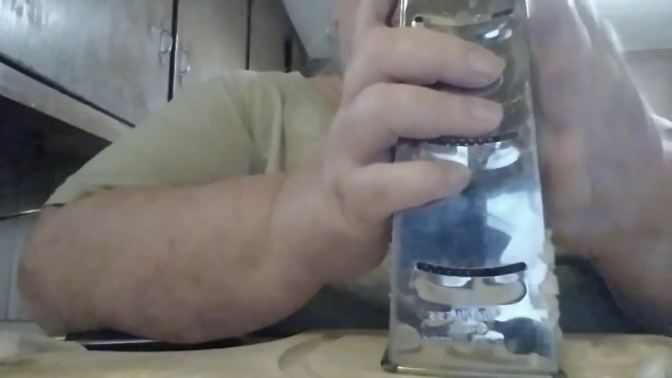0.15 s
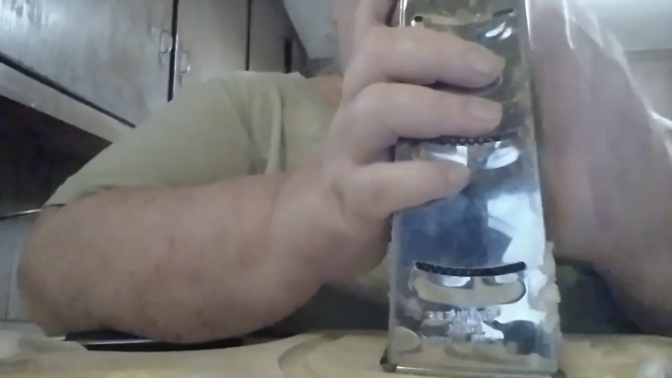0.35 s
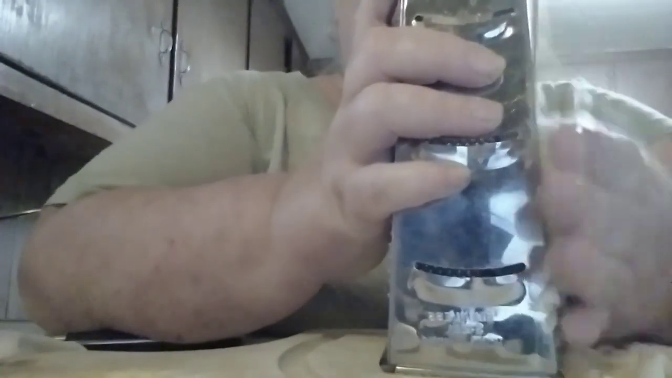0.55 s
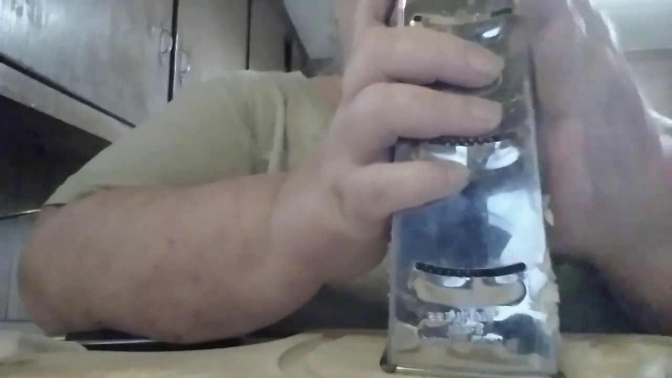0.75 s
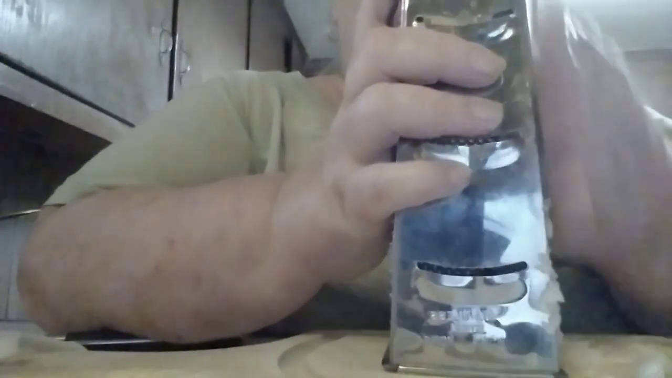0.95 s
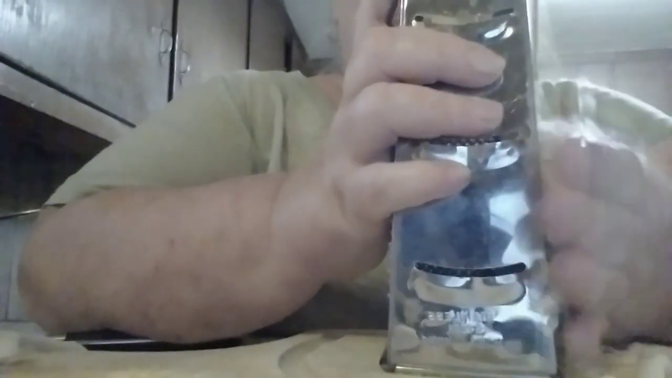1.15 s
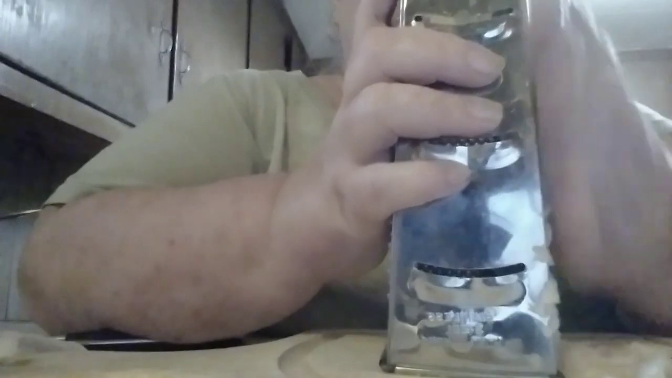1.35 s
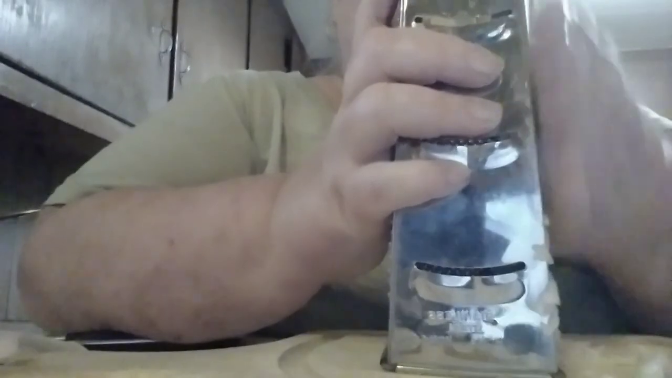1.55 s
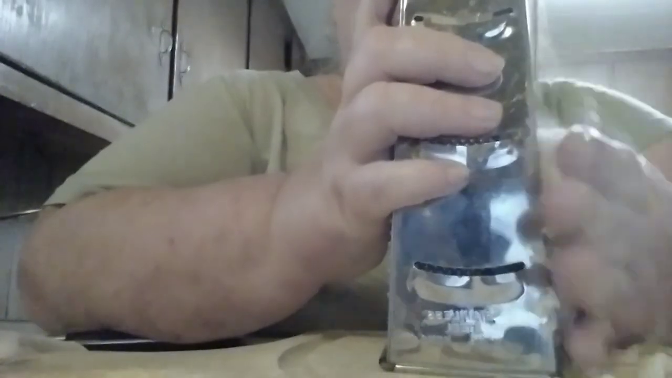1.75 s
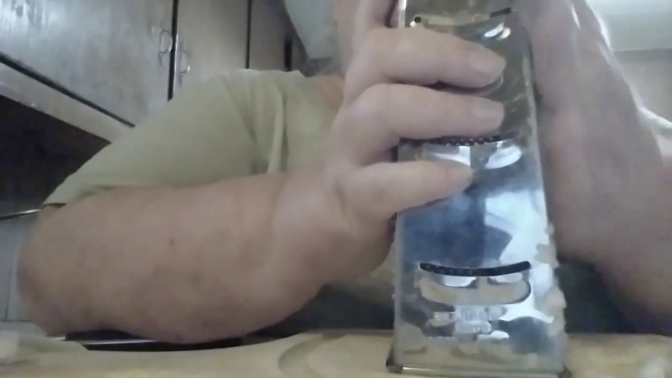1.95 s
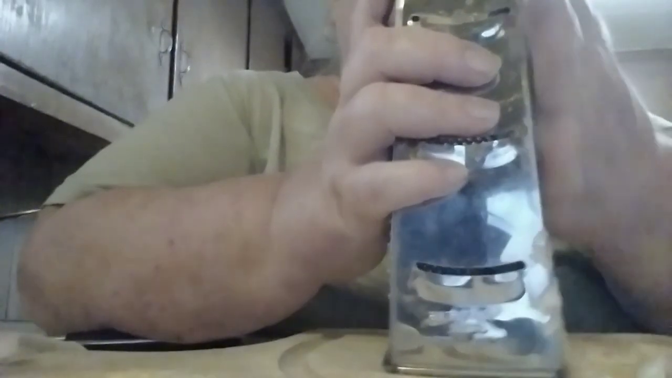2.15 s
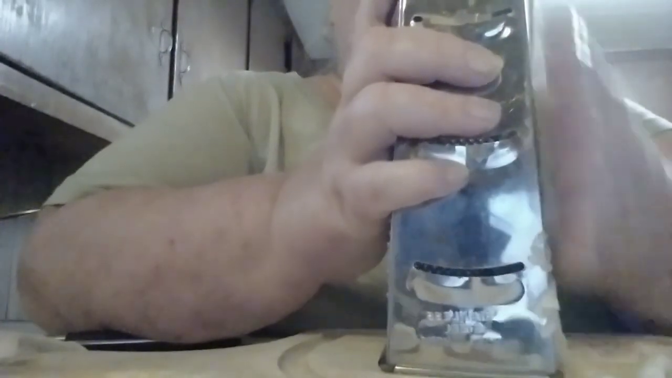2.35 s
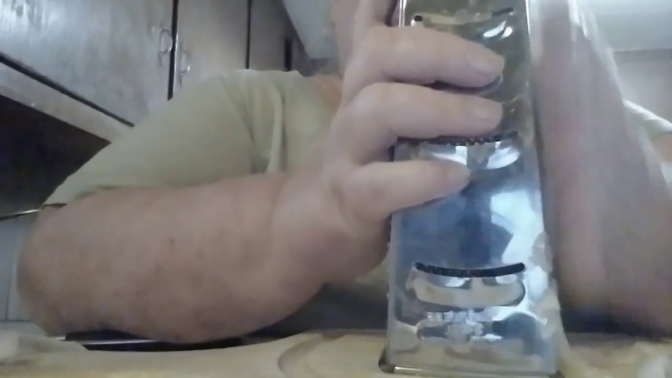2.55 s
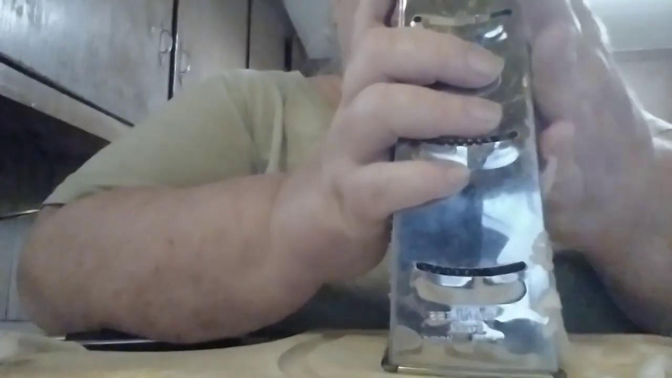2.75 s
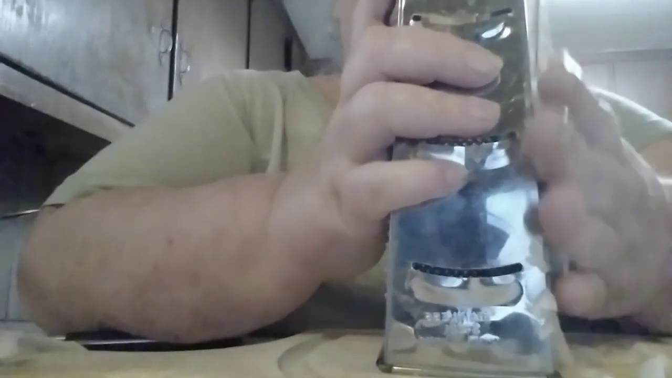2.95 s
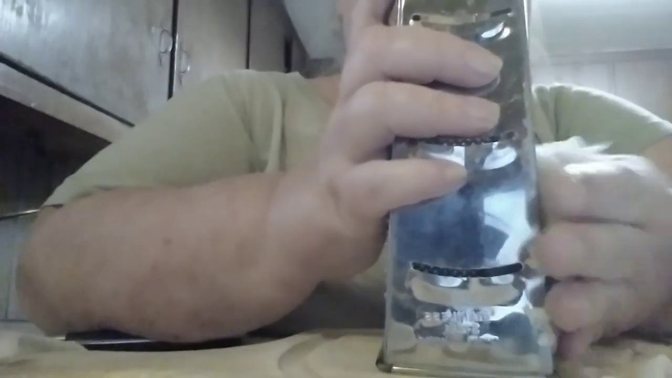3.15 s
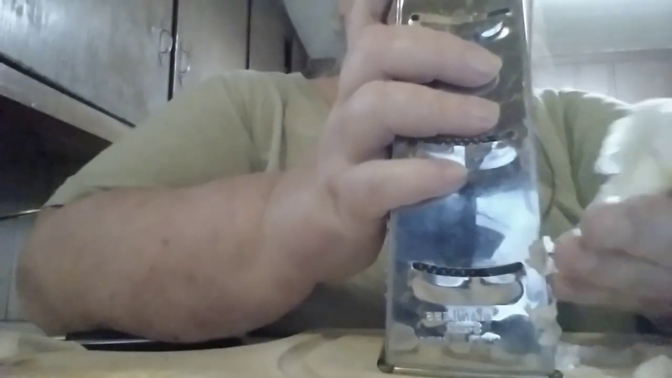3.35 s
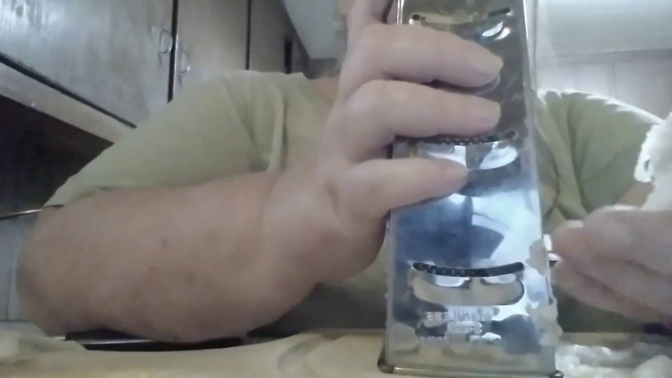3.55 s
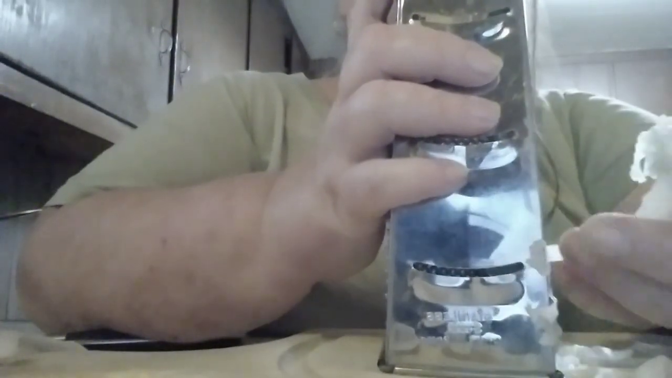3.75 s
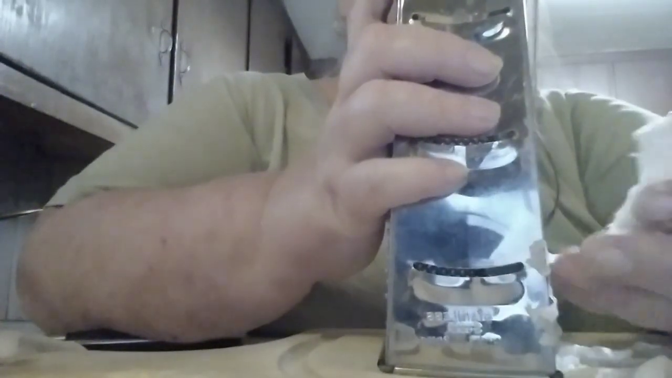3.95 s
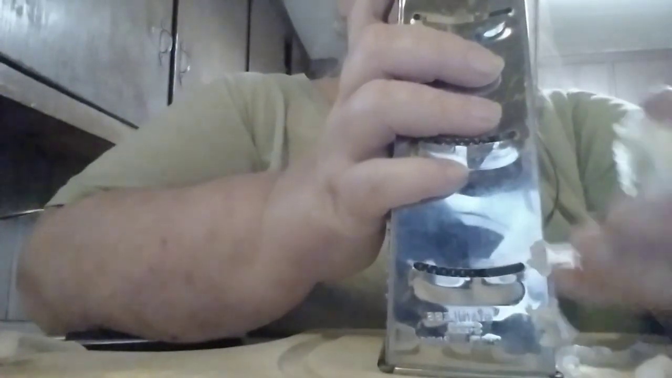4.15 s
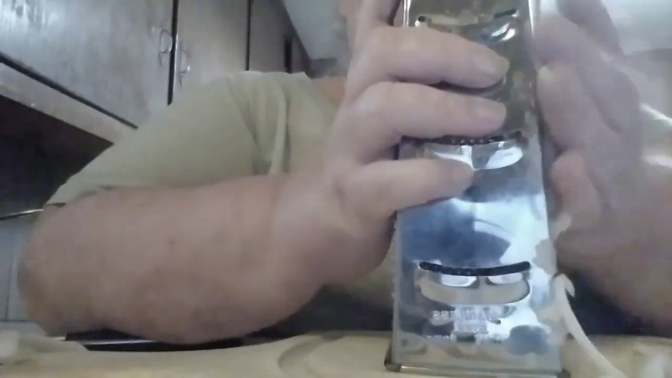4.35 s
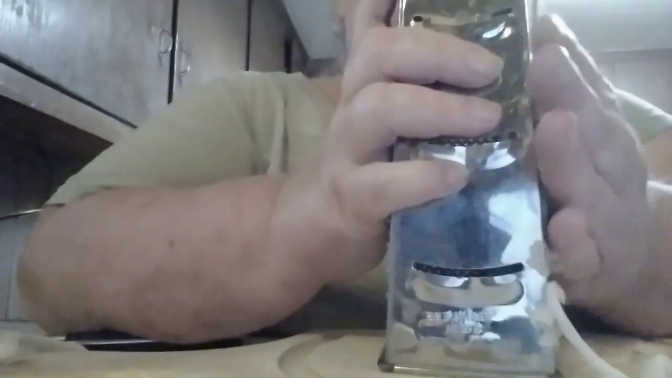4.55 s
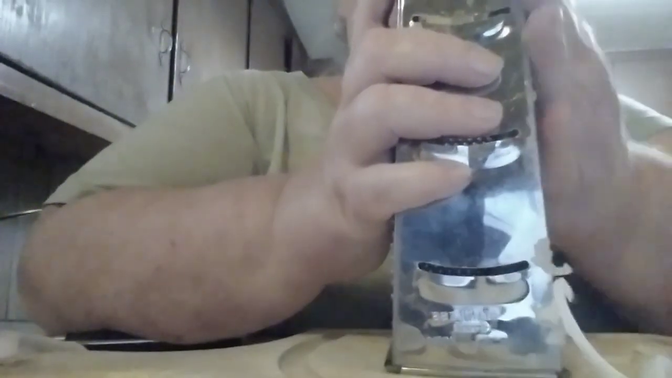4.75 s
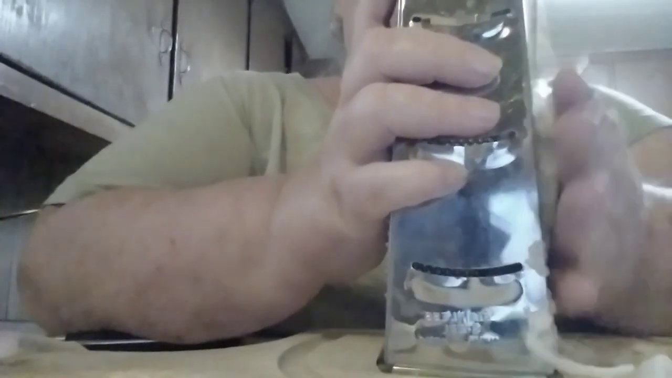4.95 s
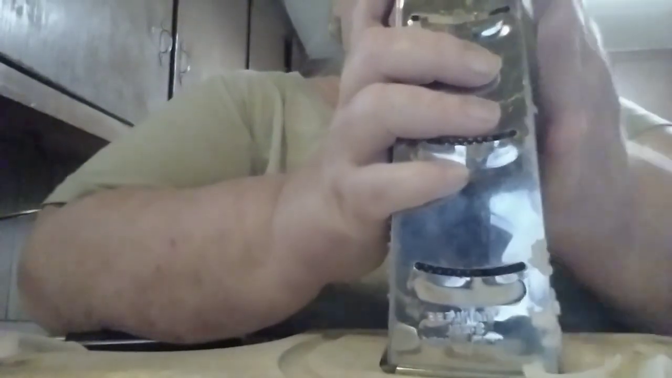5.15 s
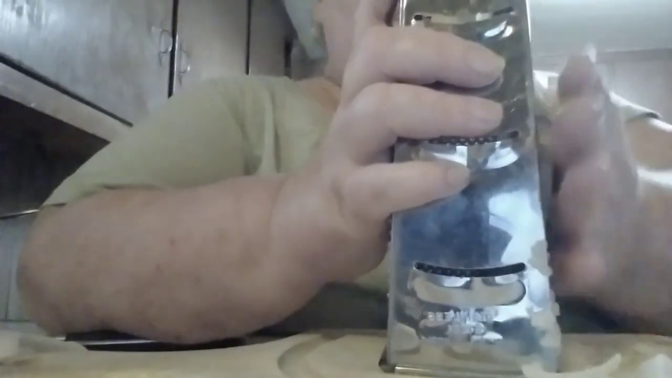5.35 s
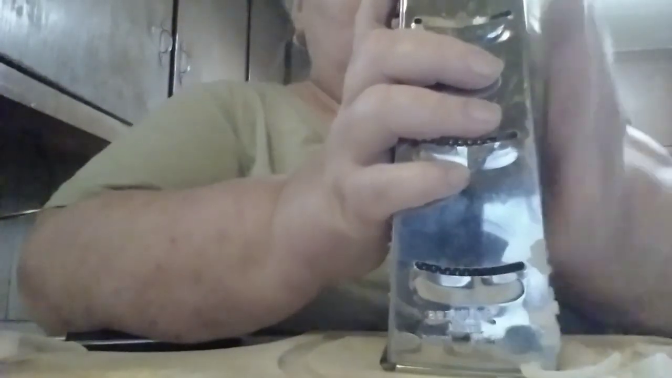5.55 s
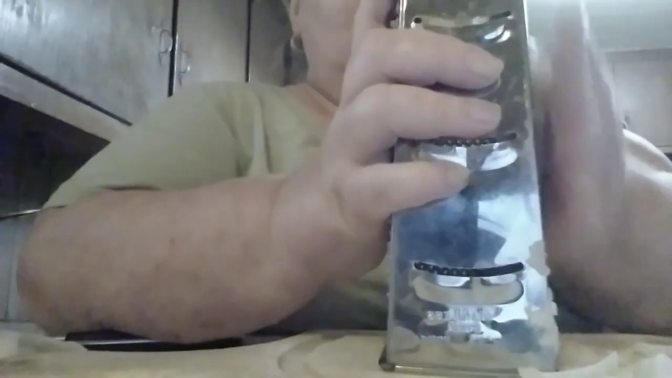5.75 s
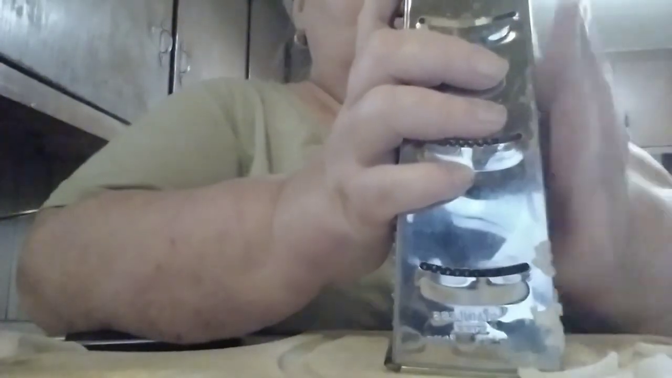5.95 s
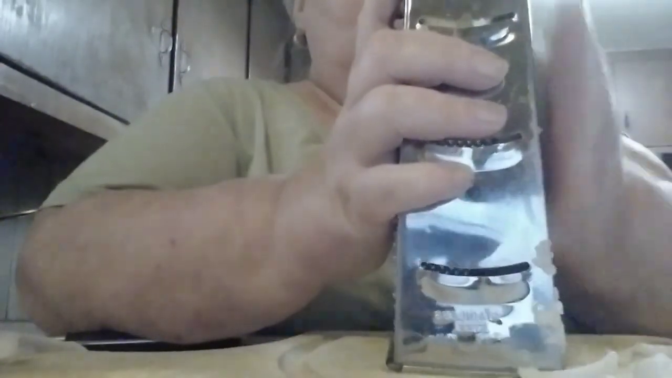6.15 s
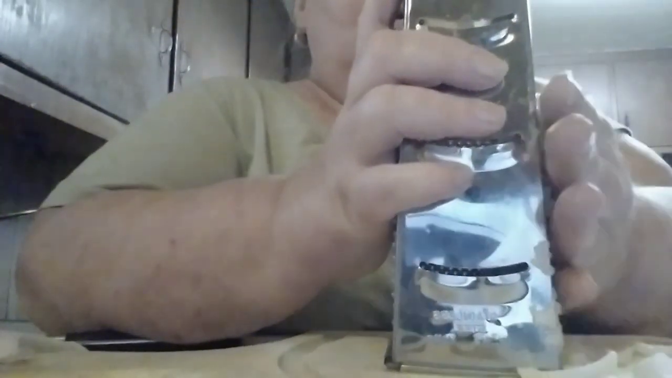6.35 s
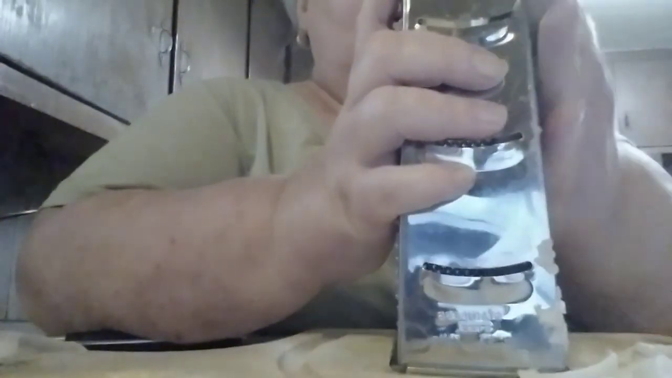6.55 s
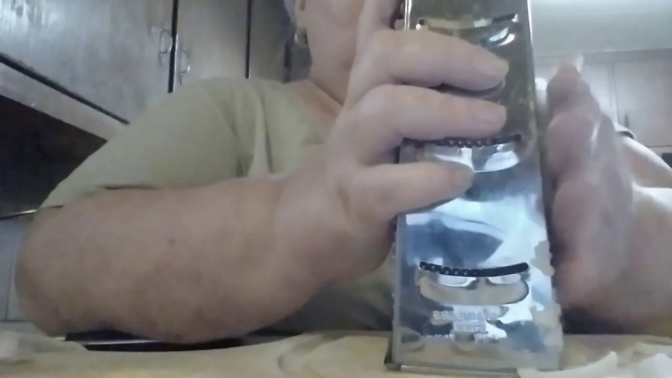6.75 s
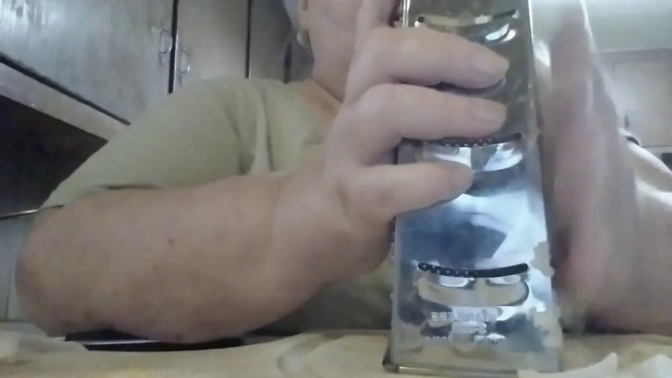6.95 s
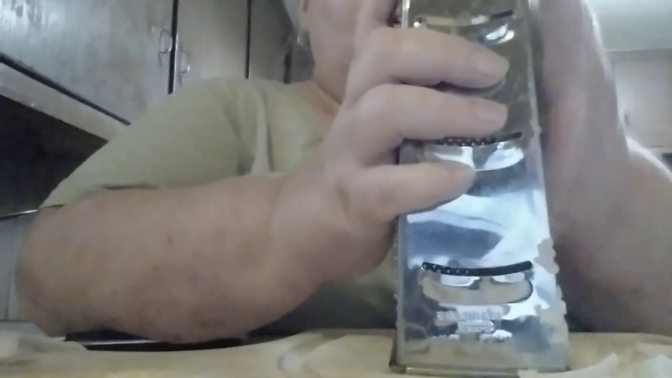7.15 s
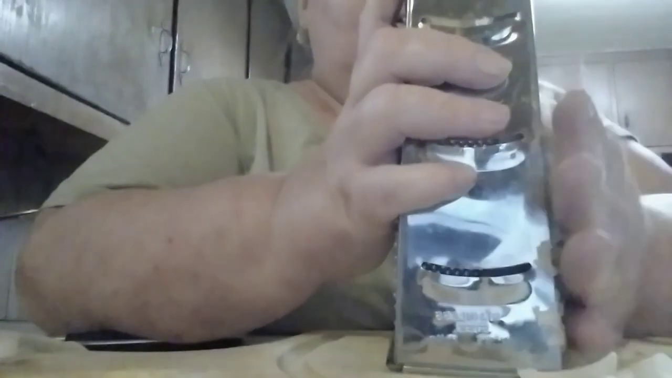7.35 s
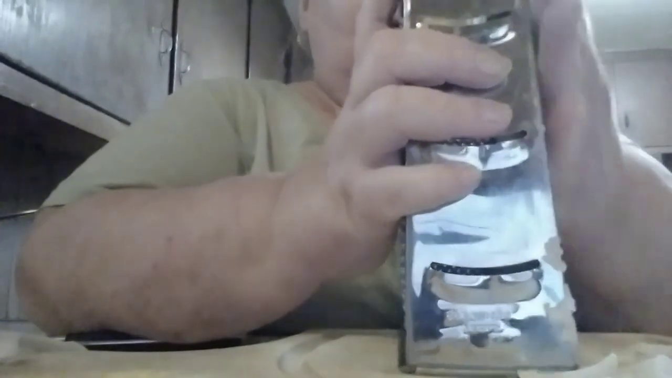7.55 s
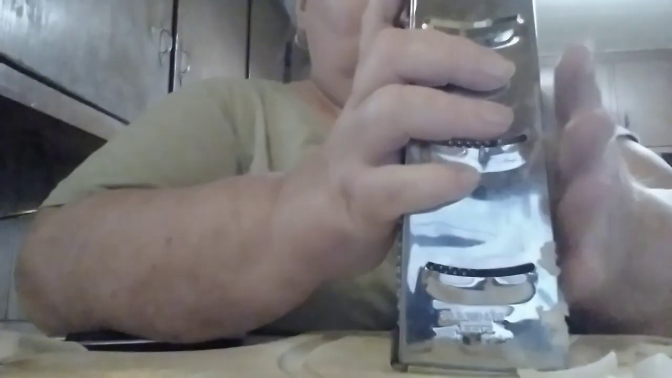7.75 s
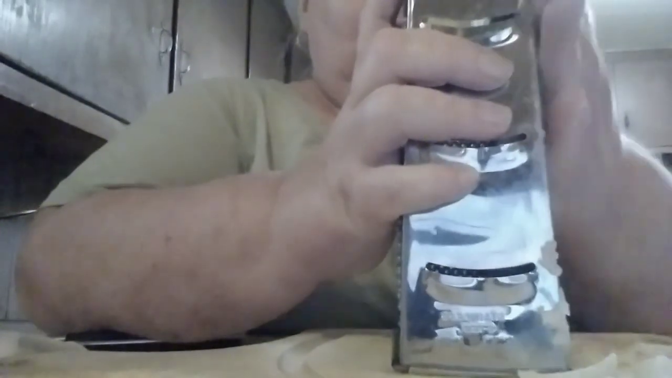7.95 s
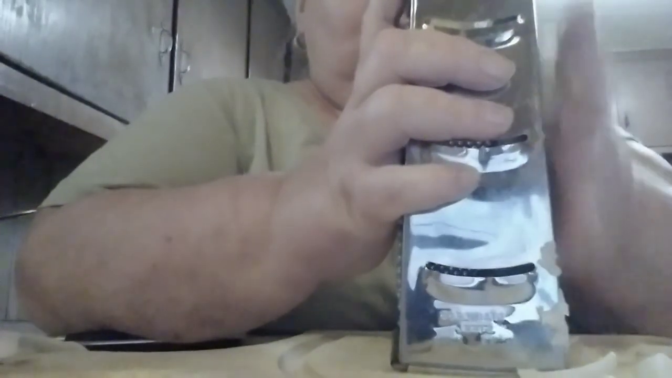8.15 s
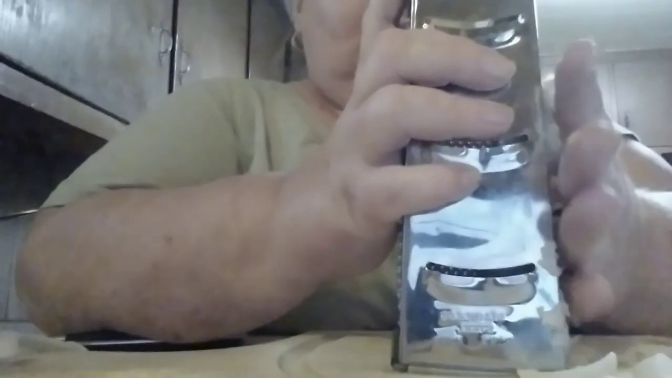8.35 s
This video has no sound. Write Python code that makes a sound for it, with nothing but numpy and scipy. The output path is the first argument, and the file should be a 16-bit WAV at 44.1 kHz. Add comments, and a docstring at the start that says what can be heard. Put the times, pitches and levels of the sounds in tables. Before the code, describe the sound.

An onion is rubbed against a steel box grater in quick rhythmic rasping strokes, pausing briefly before heavier strokes resume, close up in a kitchen.

```python
"""An onion is rubbed up and down a steel box grater that stands on a wooden board in a small kitchen.
Each push is many tiny bursts of tearing flesh, heard through the steel, and it shakes the box and board.
Each return is lighter and mostly a wet hiss. Every stroke builds to its hardest press and lets go.
Sharp clicks mark a snapping fibre or the first bite of a push; the foot's knocks clack and thump.
Partway the hand stops and turns the onion, amid soft rubs and rustles; a low rumble and hum lie behind."""
import sys
import numpy as np
from scipy import signal
from scipy.fft import rfft, irfft, next_fast_len
from scipy.io import wavfile
from scipy.ndimage import uniform_filter1d, map_coordinates

SR = 44100
rng = np.random.default_rng(int(sys.argv[2]) if len(sys.argv) > 2 else 0)


def master(y):
    """Save y as 16-bit WAV."""
    cut = np.clip(np.atleast_2d(y).T, -1, 1)
    pcm = np.round(cut * 32767)  # scale
    wavfile.write(sys.argv[1], SR, pcm.astype(np.int16))


N = 370881  # length in samples

# colour of the light wet slide: [f/Hz, level/dB]
SLIDE_COLOUR = [(150, -47), (300, -22), (380, -8.5), (900, -23), (1700, -26), (2600, -20), (4800, -10),
                (5150, 1), (8300, 1), (9500, -5), (11500, -8.5), (13500, -13), (15700, -12)]
# colour of the cutting rasp: [f/Hz, level/dB]
CUT_COLOUR = [(120, -21), (320, -23.5), (400, -8), (800, -11), (1200, 1.5), (1550, -12), (2200, -1.5),
              (3000, 1), (4800, 4), (5400, -3), (7000, -1), (10000, -6.5), (15700, -14.5)]


def grating(chatter_db=-0.5, catch_hz=130, slide_db=-0.4, cut_db=-0.3, wall_db=-0.4, shake_db=0.4):
    """Sliding hisses, cutting rasps, and the catching teeth shake box and board."""
    sliding, cutting, rubbing, shaking = efforts()
    shake = filtered(catches(rate=catch_hz, unevenness=0.35), board)
    shake = even(shake, 0.03)

    # once per swing the shaking box digs its teeth deeper, so the rasp comes in bursts
    bite = amp(chatter_db * np.clip(shake, -2, 2))
    tearing = ruptures(rate=8000, spread_db=4.5, clump_db=1.9, clump_rate=170)
    cut = through_steel(bite * tearing, CUT_COLOUR)
    cut = even(patchy(cut, depth_db=3.0, size=384), 0.038)

    slipping = ruptures(rate=9000, spread_db=6.0, clump_db=2.2, clump_rate=150)
    slide = through_steel(slipping, SLIDE_COLOUR)
    slide = even(patchy(slide, depth_db=3.5, size=512), 0.057)

    # even a light touch makes the broad side wall of the box sound
    touches = ruptures(rate=1500, spread_db=5.5, clump_db=4.5, clump_rate=55)
    rub = patchy(touches, depth_db=3.0, size=768)
    wall = even(filtered(rub, lambda hz: causal(side_wall(hz))), 0.04)

    mix = amp(slide_db) * sliding * slide
    mix = mix + amp(cut_db) * cutting * cut
    mix = mix + amp(wall_db) * rubbing * wall
    return mix + amp(shake_db) * shaking * shake


# the onion is pushed down the teeth: [start t/s, hardest press t/s, end t/s, sliding level/dB,
# cutting level/dB, side wall level/dB, jolt of the box t/s, jolt level/dB, drag on the way back level/dB]
PUSH_STROKES = [(-0.03, 0.012, 0.017, -38.0, -32.5, -42.5, 0.017, -24.0, -2),
                (0.22, 0.264, 0.272, -36.5, -32.5, -43.0, 0.254, -30.5, -1),
                (0.474, 0.513, 0.553, -36.0, -34.5, -43.0, 0.536, -26.5, -4),
                (0.78, 0.819, 0.835, -36.0, -33.0, -38.5, 0.827, -31.0, 0),
                (1.059, 1.1, 1.117, -41.5, -39.5, -42.0, 1.09, -37.0, -2),
                (1.33, 1.358, 1.402, -34.5, -32.0, -38.5, 1.382, -29.5, -1),
                (1.641, 1.696, 1.705, -36.0, -30.5, -40.5, 1.728, -32.5, -3),
                (1.924, 1.987, 2.004, -35.0, -33.0, -40.0, 1.987, -37.0, 2),
                (2.217, 2.299, 2.303, -37.0, -34.5, -46.5, 2.288, -54.0, -5),
                (2.508, 2.558, 2.589, -35.0, -35.0, -49.0, 2.575, -33.5, -4),
                (2.818, 2.874, 2.936, -32.0, -32.0, -44.0, 2.888, -26.5, 0),
                (2.975, 3.021, 3.031, -34.5, -32.0, -48.5, 3.012, -37.0, 0),
                (4.463, 4.518, 4.525, -39.5, -36.5, -46.0, 4.519, -51.0, -6),
                (4.793, 4.868, 4.912, -33.0, -32.5, -40.0, 4.89, -33.0, 3),
                (5.149, 5.226, 5.273, -33.0, -30.5, -39.5, 5.21, -32.0, 2),
                (5.534, 5.629, 5.658, -29.0, -29.0, -40.5, 5.632, -26.5, 2),
                (5.873, 5.931, 6.01, -29.5, -31.0, -41.0, 5.942, -28.5, 0),
                (6.224, 6.294, 6.321, -31.0, -32.0, -43.5, 6.333, -35.5, 3),
                (6.566, 6.606, 6.666, -30.5, -37.5, -42.5, 6.672, -44.5, 1),
                (6.89, 6.972, 6.989, -32.5, -36.0, -40.5, 6.992, -32.0, -3),
                (7.232, 7.324, 7.339, -30.0, -30.0, -38.5, 7.34, -29.0, 3),
                (7.588, 7.661, 7.691, -31.0, -31.5, -45.5, 7.676, -26.5, 1),
                (7.927, 7.986, 8.026, -33.0, -34.5, -47.5, 7.999, -36.0, -2),
                (8.264, 8.321, 8.355, -31.5, -35.0, -49.0, 8.357, -46.0, 2)]
# it is drawn lightly back up, at times in two goes: [start t/s, firmest touch t/s, end t/s,
# sliding level/dB, cutting level/dB, side wall level/dB]
RETURN_STROKES = [(0.044, 0.093, 0.124, -46.0, -56.0, -49.0), (0.297, 0.372, 0.396, -45.5, -57.0, -59.5),
                  (0.592, 0.681, 0.683, -58.0, -60.0, -57.0), (0.862, 0.891, 0.895, -51.0, -58.5, -62.5),
                  (0.916, 0.95, 0.953, -50.0, -56.5, -50.5), (1.151, 1.217, 1.231, -45.5, -58.0, -57.5),
                  (1.417, 1.424, 1.45, -42.5, -49.5, -76.0), (1.512, 1.54, 1.543, -44.0, -59.0, -53.5),
                  (1.731, 1.798, 1.85, -43.5, -52.0, -50.5), (2.032, 2.087, 2.137, -42.0, -54.0, -53.0),
                  (2.331, 2.394, 2.432, -42.0, -53.0, -58.0), (2.681, 2.699, 2.759, -44.0, -55.5, -51.0),
                  (4.33, 4.435, 4.446, -56.0, -55.0, -72.0), (4.57, 4.609, 4.614, -44.0, -49.5, -55.0),
                  (4.67, 4.709, 4.743, -42.5, -47.5, -48.5), (4.95, 5.009, 5.029, -54.0, -45.5, -49.0),
                  (5.051, 5.068, 5.07, -37.5, -42.0, -43.5), (5.379, 5.444, 5.457, -43.5, -50.5, -51.5),
                  (5.768, 5.812, 5.814, -40.0, -53.0, -51.0), (6.047, 6.15, 6.181, -41.5, -57.0, -50.5),
                  (6.431, 6.468, 6.493, -43.0, -54.5, -51.5), (6.781, 6.835, 6.837, -46.0, -62.0, -49.5),
                  (7.112, 7.165, 7.169, -45.0, -56.5, -55.5), (7.377, 7.405, 7.434, -47.0, -54.0, -65.5),
                  (7.466, 7.505, 7.512, -39.0, -51.5, -50.5), (7.809, 7.811, 7.872, -41.5, -52.0, -52.5),
                  (8.128, 8.135, 8.186, -40.0, -51.0, -54.0)]
# the light drag on the steel between strokes, save in the pause: [start t/s, end t/s,
# sliding level/dB, cutting level/dB, side wall level/dB]
LIGHT_CONTACT = [(-0.1, 3.02, -55.5, -76, -82), (4.45, 8.5, -55, -74, -74)]
# how fast a stroke swells and fades; rows: sliding, cutting, side wall; columns: [attack before the start
# in dB/s, build up to the press in dB/s, easing after it in dB/s, release after the end in dB/s]
PUSH_SLOPES = [(634, 35, 130, 546), (581, 183, 58, 812), (625, 126, 42, 876)]
# the same rows and columns for the way back
RETURN_SLOPES = [(937, 62, 94, 420), (401, 30, 211, 129), (653, 138, 137, 352)]
LIFT_DB_PER_S = 115  # the onion leaves the steel, or settles on it
JOLT_DB_PER_S = 360  # the shaking swells to the jolt and dies away
CUT_SHAKE_DB, SLIDE_SHAKE_DB = -9.5, -21  # how much cutting and sliding shake the box by themselves
UNEVEN_DB, UNEVEN_PER_S = 0.5, 45  # the onion's layers give way unevenly


def efforts():
    """Gains of sliding, cutting, side wall and shaking, from the strokes and the drag between them."""
    t = np.arange(0, N, 64) / SR  # coarse time steps, filled in at the end
    drag = dragging(t)
    gains = []
    for k, (push_slopes, return_slopes) in enumerate(zip(PUSH_SLOPES, RETURN_SLOPES)):
        parts = []
        for start, press, end, *db in PUSH_STROKES:
            parts.append(amp(db[k] + stroke(t, start, press, end, push_slopes)))
        for start, press, end, *db in RETURN_STROKES:
            parts.append(amp(db[k] + stroke(t, start, press, end, return_slopes)))
        for start, end, *db in LIGHT_CONTACT:
            away = np.abs(t - np.clip(t, start, end))  # seconds outside the contact
            parts.append(drag * amp(db[k] - LIFT_DB_PER_S * away))
        gains.append(np.linalg.norm(parts, axis=0))  # powers add
    sliding, cutting, rubbing = gains

    shakes = [amp(db - JOLT_DB_PER_S * np.abs(t - s)) for *_, s, db, _ in PUSH_STROKES]
    shakes += [amp(CUT_SHAKE_DB) * cutting, amp(SLIDE_SHAKE_DB) * sliding]
    shaking = np.linalg.norm(shakes, axis=0)

    uneven = amp(UNEVEN_DB * wobble(UNEVEN_PER_S))
    every_sample = np.arange(N) / SR
    return [uneven * np.interp(every_sample, t, gain) for gain in (sliding, cutting, rubbing, shaking)]


def stroke(t, start, press, end, slopes):
    """Level in dB under its peak: the onion gets moving, is pressed ever harder, eases and stops."""
    attack, build, easing, release = slopes
    rise = attack * np.maximum(start - t, 0) + build * np.maximum(press - t, 0)
    fall = easing * np.maximum(t - press, 0) + release * np.maximum(t - end, 0)
    return -rise - fall


# the hand stands still this long before a push, and takes this long to slow down
TURN_LEAD_S, TURN_S = 0.053, 0.046


def dragging(t):
    """Gain of the light drag: the hand stands still at the top of each swing and leans on the steel anew."""
    turns = np.array([push[0] for push in PUSH_STROKES]) - TURN_LEAD_S
    to_nearest_turn = np.abs(t - turns[:, None]).min(axis=0)
    motion = np.minimum(to_nearest_turn / TURN_S, 1) ** 2
    lean_db = np.array([push[-1] for push in PUSH_STROKES])
    return motion * amp(lean_db[np.searchsorted(turns[1:], t)])


def ruptures(rate, spread_db, clump_db, clump_rate):
    """Tiny bursts of onion cells, uneven in size and bunched as teeth bite."""
    hits = rng.random(N) < rate / SR  # rate is bursts per second
    sizes = amp(spread_db * np.clip(rng.standard_normal(N), -2.5, 2.5))
    signs = rng.choice([-1, 1], N)
    return hits * sizes * signs * amp(clump_db * wobble(clump_rate))


def catches(rate, unevenness):
    """The onion catches and slips on row after row of teeth."""
    passed = np.cumsum(rate * np.exp(unevenness * wobble(45))) / SR  # rows passed so far
    new_row = np.diff(np.floor(passed), prepend=0)
    return new_row * amp(3.8 * rng.standard_normal(N))


def patchy(x, depth_db, size):
    """Each tooth bites with its own colour for a few milliseconds."""
    z = signal.stft(x, nperseg=size)[2]
    field = uniform_filter1d(rng.standard_normal(z.shape), size=3, axis=0)
    field = uniform_filter1d(field, size=3, axis=1)
    return signal.istft(z * amp(depth_db * unit(field)), nperseg=size)[1][:N]


# ringing tones of the toothed face of the box: [f/Hz, width f/Hz, level/dB]
STEEL_TONES = [(1820, 45, 6), (1990, 110, -3), (2594, 160, -1), (3190, 75, 1), (5970, 150, -12.5),
               (6740, 380, 3.5), (7800, 350, -10)]


def through_steel(x, spectrum):
    """Contact forces coloured by this spectrum make the toothed steel face ring."""
    return filtered(x, lambda hz: causal(amp(along(spectrum, hz)) * np.hypot(1, peaks(STEEL_TONES, hz))))


def side_wall(hz, wall_hz=1215, width_hz=400):
    """Gain of the box's broad side wall, a wide resonance because the hand damps it."""
    return peaks([(wall_hz, width_hz, 0)], hz) ** 2


# low tones of box and board shaken together: [f/Hz, width f/Hz, level/dB]
BODY_TONES = [(75, 15, 3), (110, 16, 2.5), (134, 24, 3.5), (166, 16, -10), (262, 24, -15.5), (408, 41, -13),
              (500, 87, -12.5)]


def board(hz):
    """Box and board swing as one heavy body, with a hollow between each pair of modes."""
    modes = sum(amp(db) * 1j * hz * w / (c * c - hz * hz + 1j * hz * w) for c, w, db in BODY_TONES)
    # soft flesh and wood round off every push
    return modes / (1 + 1j * hz / 280) ** 2


# sharp clicks as a fibre snaps or the first teeth catch at the start of a push: [t/s, level/dB]
SHARP_CLICKS = [(0.315, -22.5), (1.317, -27), (1.504, -27), (2.2132, -19.5), (2.813, -26), (4.1872, -34),
                (4.199, -33.5), (4.3376, -39), (4.3504, -42), (4.574, -29.5), (4.6633, -26), (4.806, -14),
                (5.005, -24), (5.859, -24), (6.219, -20), (6.5665, -17), (6.886, -21), (7.236, -22),
                (7.4994, -25.5), (7.918, -26), (8.1366, -20), (8.2806, -17)]


def sharp_clicks(t60=0.0059, gain_db=1):
    """A fibre snaps or the first teeth catch: one sharp click and a splutter fading 60 dB in t60 seconds."""
    track, t = np.zeros(N), np.arange(SR // 20) / SR
    for s, db in SHARP_CLICKS:
        splutter = 0.2 * rng.standard_normal(len(t)) * amp(-60 * t / t60)
        click = (t == 0) + splutter
        add(track, s, amp(db + gain_db) * click)
    return through_steel(track, [(300, -34), (2000, -14.5), (5000, 9.5), (9000, 7.5), (15000, -9)])


# the foot knocks on the board: [t/s, clack level/dB, thump level over the clack/dB,
# side wall's share of the ring level/dB]
FOOT_KNOCKS = [(0.051, -38, 9, 0), (1.582, -31, -6, 6), (1.728, -22, -2, 7), (1.973, -25, -20, 0),
               (2.869, -42, 16, 0), (4.503, -26, -3, -5), (4.749, -33.5, -1, 0), (4.928, -16, -4, 5),
               (4.942, -36, 16, 0), (4.984, -20, -1, -1), (5.313, -37, -14, 0), (6.192, -31.5, -18, -4),
               (6.35, -38, -13, 0), (6.527, -32, -5, 1), (6.837, -24.5, -7, 1), (7.152, -24, -13, -4),
               (7.522, -23.5, -9, 1), (7.869, -43, -8, 0), (7.996, -44, 16, 0), (8.206, -28, -9, 3)]
# tones of the foot's clack on the wood: [f/Hz, width f/Hz, level/dB]
FOOT_TONES = [(400, 60, -4), (536, 100, -5), (700, 140, 2), (1085, 120, -1.5), (1240, 64, 1.5),
              (1740, 80, -1.5), (1950, 130, -3), (2210, 110, -8.5), (2860, 170, -13.5), (3260, 170, -9)]


def knocks(clack_db=-1, thump_db=-4, bounce_s=0.001724, rattle_db=-19, rattle_t60=0.062):
    """The foot lands on one edge, then the other, and rattles to rest; the board thumps below."""
    track, t = np.zeros(N), np.arange(SR // 5) / SR
    hz = np.fft.rfftfreq(len(t), 1 / SR)
    wood = causal(peaks(FOOT_TONES, hz) / np.hypot(1, (hz / 3800) ** 4))
    thump = irfft(board(hz))
    for s, db, low_db, wall_db in FOOT_KNOCKS:
        fade = amp(rattle_db - 60 * t / rattle_t60)
        rattle = fade * rng.standard_normal(len(t)) * (rng.random(len(t)) < 0.3)
        force = (t == 0) + rattle
        force[round(bounce_s * rng.uniform(0.7, 1.3) * SR)] += 1  # the second edge
        wall = causal(amp(wall_db * side_wall(hz)))
        clack = irfft(rfft(force) * wood * wall)
        add(track, s, amp(db + clack_db) * clack / np.abs(clack).max())
        add(track, s, amp(db + low_db + thump_db) * thump / np.abs(thump).max())
    return track


# soft rubs, rustles and squishes in the pause, some perhaps the grater shifting on the board:
# [middle t/s, length t/s, f/Hz, width f/Hz, level/dB]
PAUSE_SOUNDS = [(3.124, 0.052, 610, 330, -54.5), (3.627, 0.082, 14100, 3000, -58),
                (3.785, 0.1, 160, 90, -47), (3.79, 0.12, 910, 100, -62.5), (3.825, 0.08, 3500, 3500, -67),
                (4.214, 0.08, 5850, 6000, -55), (4.265, 0.06, 500, 200, -54),
                (4.278, 0.15, 3000, 4020, -63), (4.1, 0.25, 920, 130, -68), (4.3, 0.2, 980, 200, -64)]


def pause_sounds():
    """Soft rubs, rustles and squishes in the pause: swells of noise, each in its own band."""
    track = np.zeros(N)
    for s, length, hz, width, db in PAUSE_SOUNDS:
        swell = np.hanning(int(length * SR))
        band = peaks([(hz, width, 0)], np.fft.rfftfreq(SR, 1 / SR)) ** 2
        noise = unit(irfft(rfft(rng.standard_normal(SR)) * band))
        add(track, s - length / 2, amp(db) * swell * noise[:len(swell)])
    return track


# how long the kitchen's echo takes to fade by 60 dB: [f/Hz, t/s]
ECHO_TIMES = [(150, 0.15), (1500, 0.13), (6000, 0.16), (15000, 0.25)]


def kitchen(x, wet_db=-14):
    """Cupboards and walls answer briefly, a little differently as the arms move."""
    wet, hop = np.zeros(N), SR // 3
    for start in range(0, N, hop):
        # a fresh burst of noise, fading at its own pace in each band, is the echo for this third of a second
        hz, t, z = signal.stft(rng.standard_normal(SR // 3), SR, nperseg=256)
        fade = amp(-60 * t / along(ECHO_TIMES, hz)[:, None])
        tail = signal.istft(z * fade, SR, nperseg=256)[1]
        echo = signal.fftconvolve(x[start:start + hop], tail / np.linalg.norm(tail))
        add(wet, start / SR + 0.004, echo)
    return x + amp(wet_db) * wet


# colour of the still kitchen: [f/Hz, level/dB]
ROOM_COLOUR = [(15, -39), (30, -19), (66, 1.5), (128, -9), (180, -2.5), (264, -2.5), (318, -10), (370, -6),
               (640, -16), (900, -16.5), (1100, -27.5), (2700, -28.5), (4000, -33.5), (6500, -37),
               (7400, -33.5), (8600, -37), (15000, -52.5)]
# hum of a kitchen appliance: [f/Hz, level/dB]
HUM_TONES = [(75.4, -68), (269.3, -59.5)]


def room_tone(air_db=-60, hum_db=-1):
    """Low kitchen rumble of shaped noise, with a slightly unsteady hum of sine tones."""
    t = np.arange(N) / SR
    air = unit(filtered(rng.standard_normal(N), lambda hz: amp(along(ROOM_COLOUR, hz))))
    hum = np.zeros(N)
    for hz, db in HUM_TONES:
        hum += amp(db + hum_db) * np.sin(2 * np.pi * hz * t + 0.5 * wobble(3.8))
    return amp(air_db) * air + hum


def amp(db):
    """Decibels to gain."""
    return 10 ** (np.asarray(db) / 20)


def unit(x):
    """Scale to rms 1."""
    return x / np.sqrt(np.mean(x ** 2) + 1e-20)


def even(x, seconds):
    """Hold the rms near 1 over this time, keeping the finer texture."""
    power = uniform_filter1d(x ** 2, size=int(seconds * SR))
    power = uniform_filter1d(power, size=int(seconds * SR))
    return x / np.sqrt(np.abs(power) + 1e-20)


def along(points, hz):
    """Read a curve of (Hz, value) points on a log frequency axis."""
    f, v = np.transpose(points)
    return np.interp(np.log(hz + 1), np.log(f + 1), v)


def wobble(rate):
    """A smooth random curve with this many random points a second."""
    return map_coordinates(rng.standard_normal(int(N * rate / SR) + 4), [np.arange(N) * rate / SR])


def filtered(x, response):
    """Filter x by a complex response of frequency."""
    size = 2 * next_fast_len(N // 2 + SR // 4)  # spare room for the ringing
    return irfft(rfft(x, size) * response(np.fft.rfftfreq(size, 1 / SR)), size)[:N]


def causal(gain):
    """The response with this gain that rings only after its cause (minimum phase)."""
    cepstrum = irfft(np.log(np.maximum(gain, 1e-6)))
    half = len(cepstrum) // 2
    return np.exp(rfft(np.r_[cepstrum[0], 2 * cepstrum[1:half], np.zeros(half)]))


def peaks(modes, hz):
    """Joint gain of (Hz, width Hz, dB) resonances, their powers added."""
    return np.sqrt(sum(np.abs(amp(db) * hz * w / (c * c - hz * hz + 1j * hz * w)) ** 2 for c, w, db in modes))


def add(track, s, sound):
    """Mix a sound into the track at time s in seconds."""
    part = track[max(round(s * SR), 0):][:len(sound)]
    part += sound[:len(part)]


def scene():
    """The grater close to the microphone, the room behind it."""
    close = grating() + sharp_clicks() + knocks() + pause_sounds()
    return (kitchen(close) + room_tone())[None]


def record(dry, low_hz=36, top_hz=15800):
    """The microphone sheds the deepest bass and keeps nothing above its band limit."""
    return filtered(dry[0], lambda hz: (hz < top_hz) * 1j * hz / (low_hz + 1j * hz))[None]


dry = scene()
out = record(dry)
master(out)
```